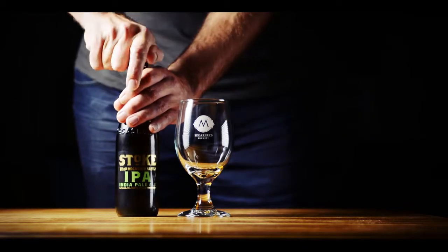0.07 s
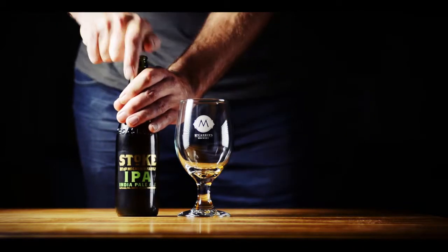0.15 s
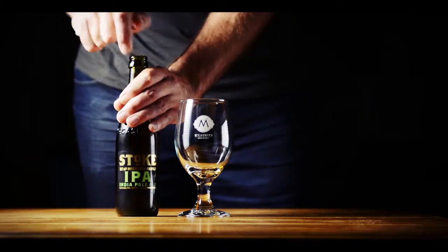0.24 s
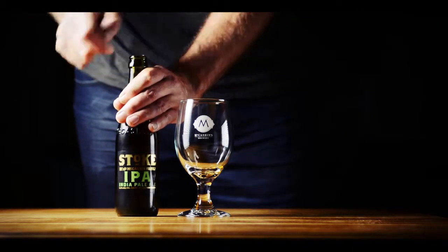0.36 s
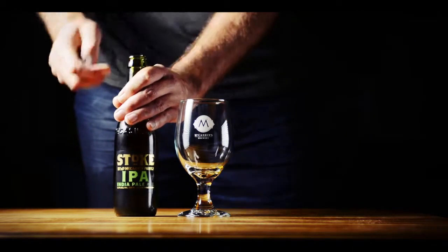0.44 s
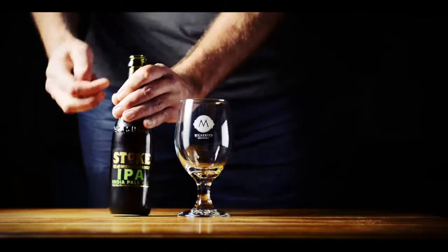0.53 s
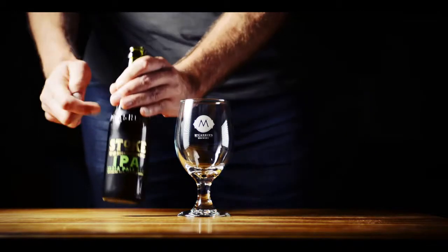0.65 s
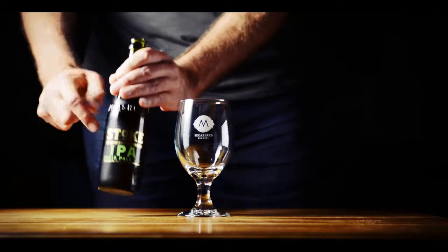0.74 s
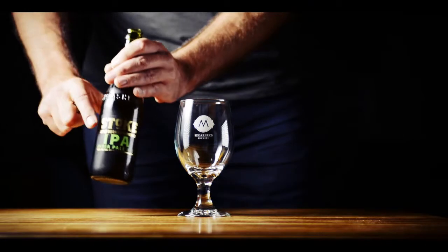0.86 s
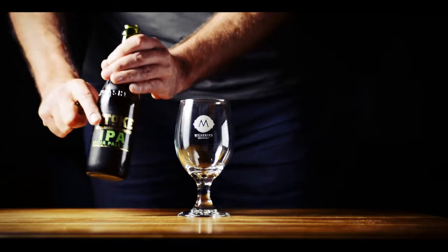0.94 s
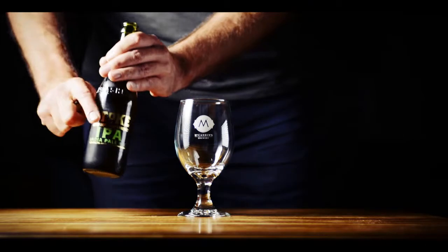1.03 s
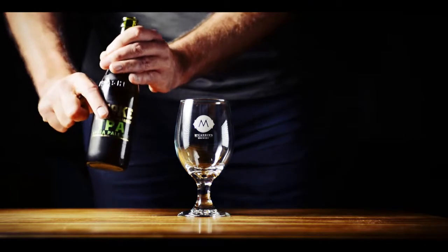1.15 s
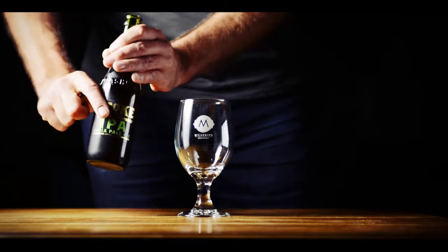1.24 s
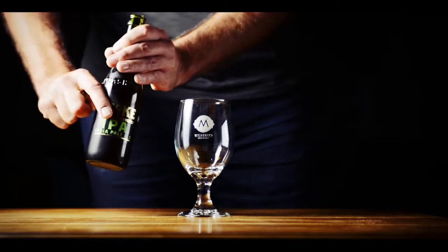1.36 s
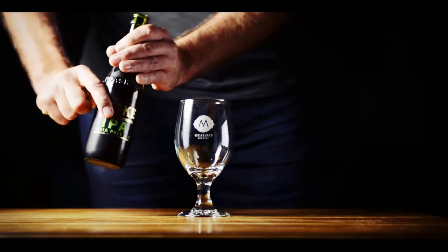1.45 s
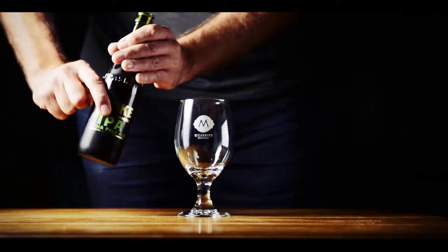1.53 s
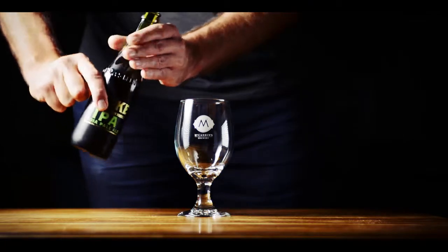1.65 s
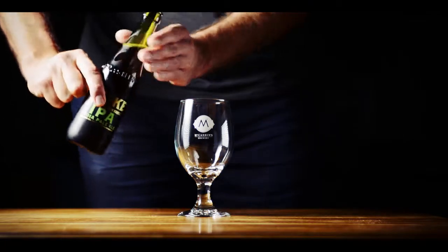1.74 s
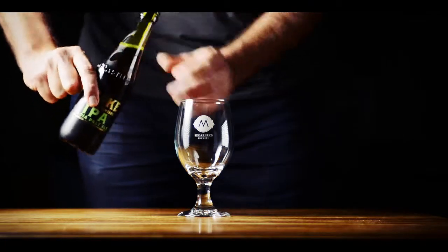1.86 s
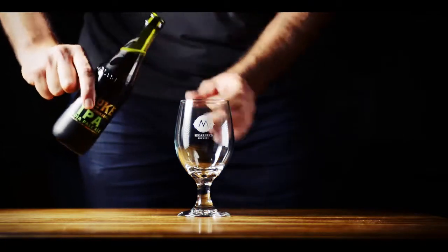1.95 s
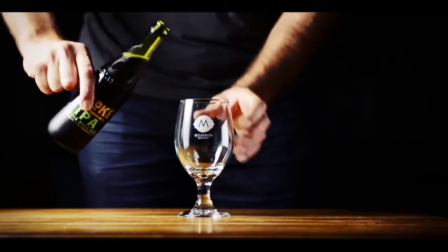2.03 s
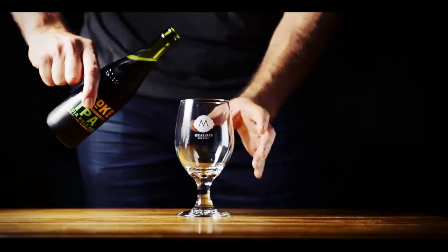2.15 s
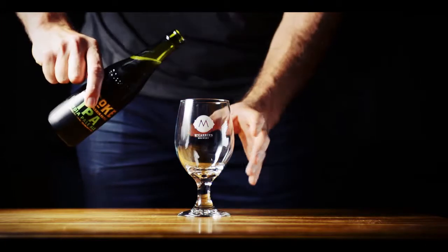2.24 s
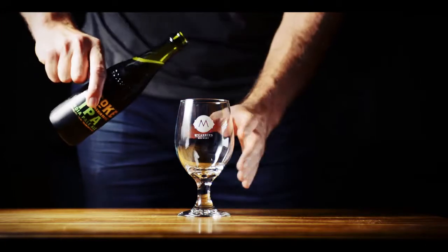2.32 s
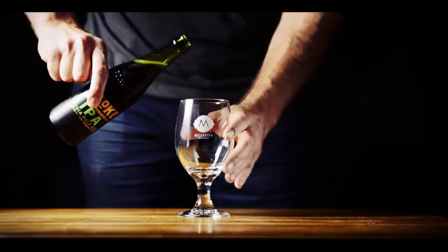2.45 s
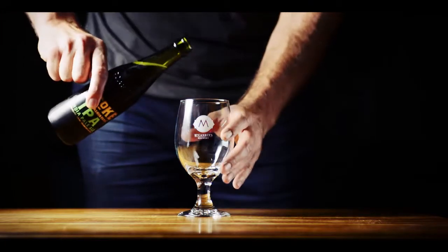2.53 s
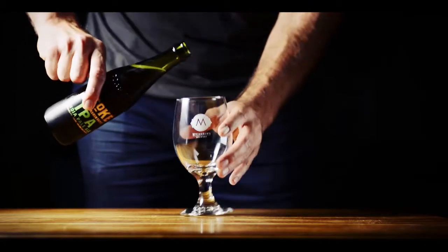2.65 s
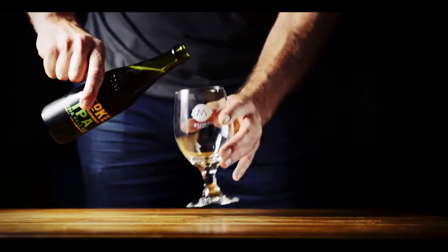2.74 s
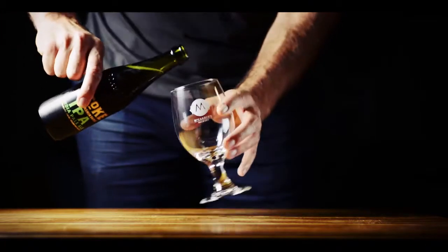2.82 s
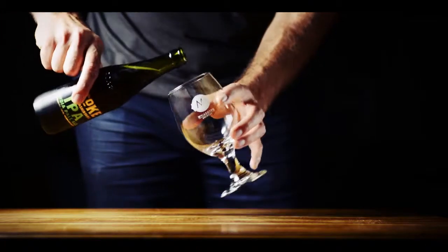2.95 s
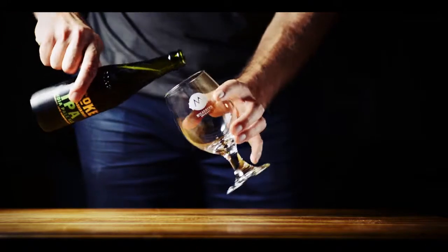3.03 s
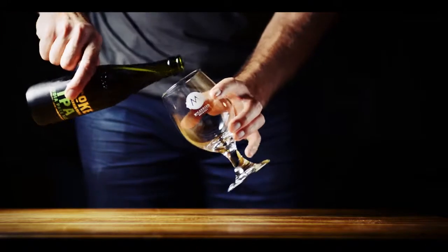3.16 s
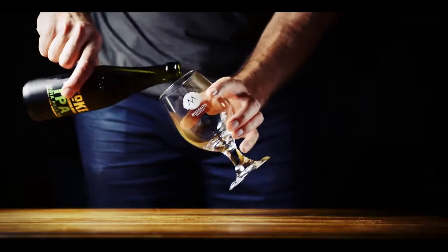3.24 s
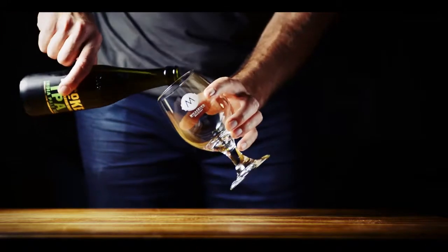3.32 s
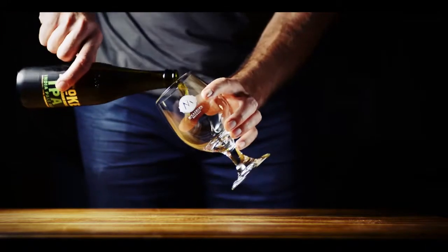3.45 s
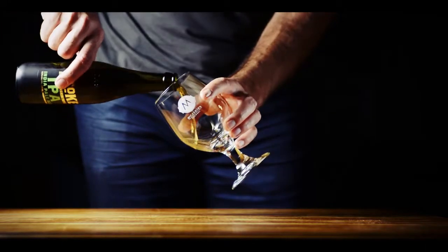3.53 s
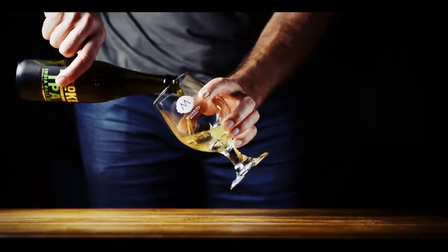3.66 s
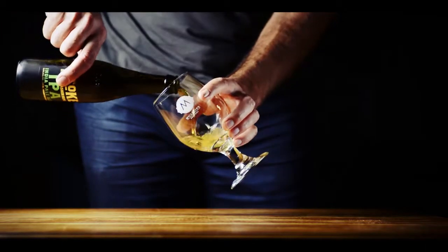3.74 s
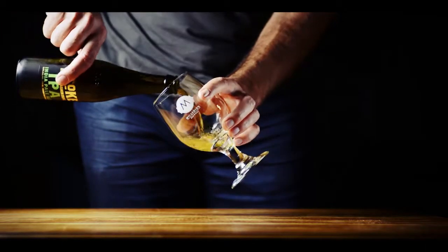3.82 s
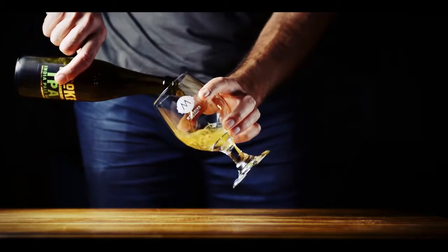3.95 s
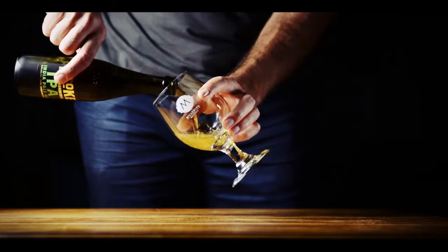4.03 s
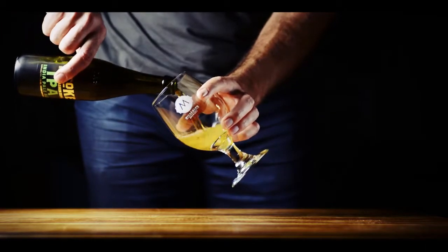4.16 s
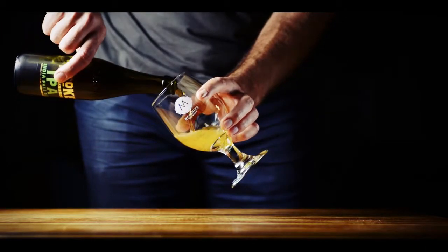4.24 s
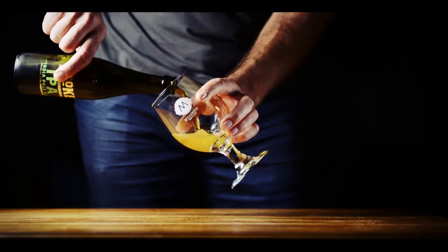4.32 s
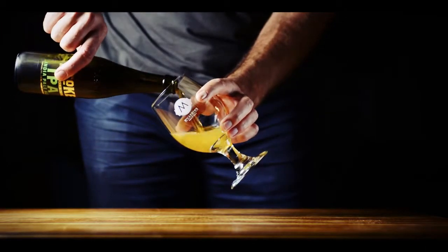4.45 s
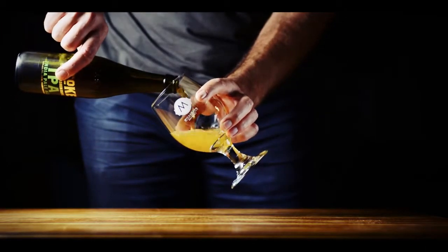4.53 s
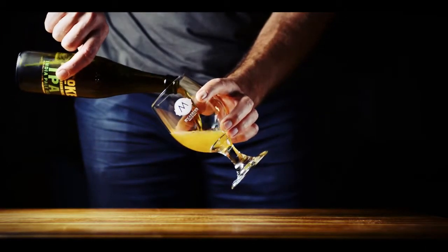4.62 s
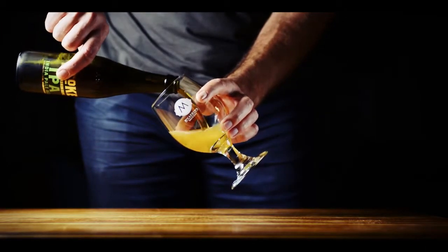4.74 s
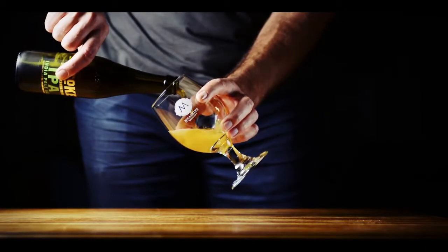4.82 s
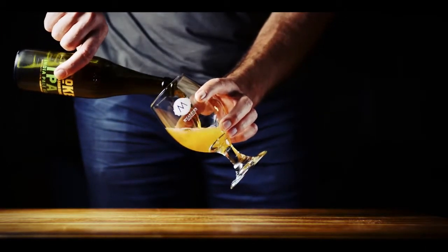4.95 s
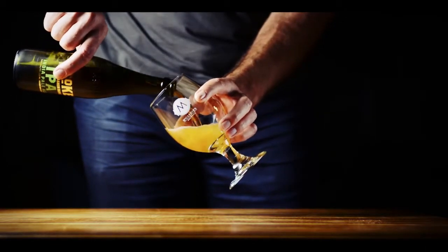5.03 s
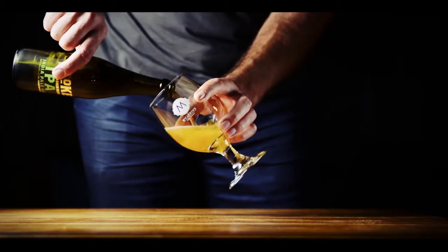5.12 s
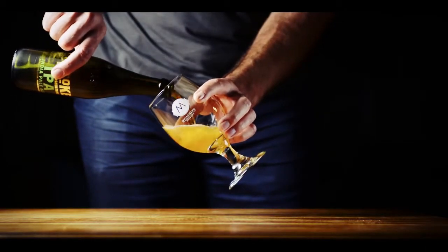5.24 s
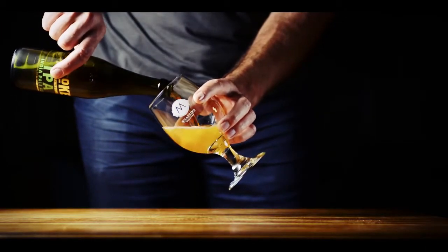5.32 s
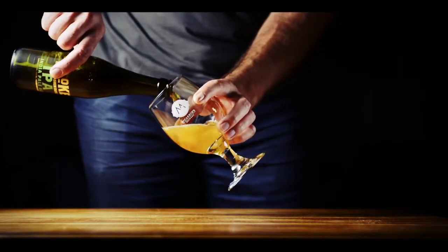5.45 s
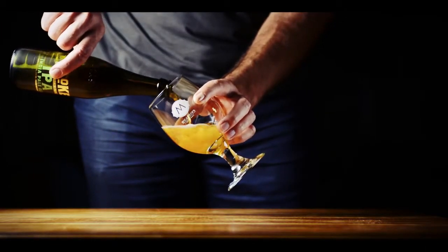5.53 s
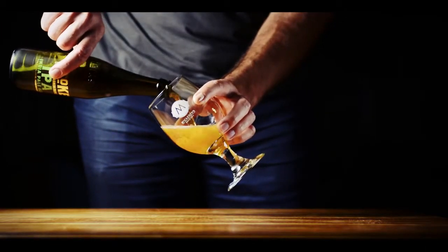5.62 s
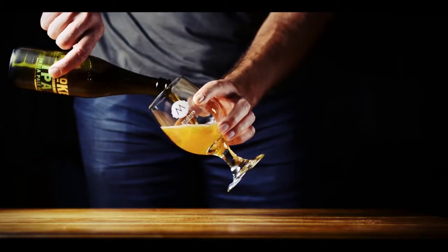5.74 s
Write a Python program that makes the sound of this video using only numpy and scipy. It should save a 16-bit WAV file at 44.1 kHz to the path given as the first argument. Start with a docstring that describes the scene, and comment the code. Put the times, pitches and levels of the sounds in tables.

```python
"""Beer glugs out of a bottle neck into a tilted glass: slugs ring the bowl, bubbles plop and plink as swept tones.
Before it a full bottle bumps a wooden table and its crimped metal cap is wrenched off, dropped and left
rattling, from clicks and grit driving resonant modes; fingers tick on the label as short noise puffs, and a
stemmed glass is lifted with a knock. Behind it lie a quiet room's air noise, a faint machine hum and hiss.
"""
import sys
import numpy as np
from scipy import signal
from scipy.fft import rfft, irfft, next_fast_len
from scipy.io import wavfile

SR = 44100
rng = np.random.default_rng(int(sys.argv[2]) if len(sys.argv) > 2 else 0)


def bounce(signal):
    """Save signal as a 16-bit WAV file at the path given by the first command-line argument."""
    frames = np.transpose(np.atleast_2d(signal))
    limited = np.clip(frames, -1, 1)
    pcm = np.round(limited * 32767).astype(np.int16)
    wavfile.write(sys.argv[1], SR, pcm)


N = 254898

# Room-tone spectrum: pitch_hz, level_db (per Hz, relative)
AIR_SPECTRUM = [(15, -58), (25, -25), (43, -11.5), (102, -4), (167, -8), (191, -7), (303, -9.5),
                (1170, -20.5), (1810, -20.5), (2720, -25), (8980, -28.5), (16300, -27)]
# Hiss spectrum: pitch_hz, level_db (per Hz, relative)
HISS_SPECTRUM = [(24, -29), (40, -9.5), (233, -6), (1250, -11), (14700, -13), (16300, -17.5)]
# Hums of a distant machine: pitch_hz, width_hz, level_db
MACHINE_HUMS = [(60, 9.7, -84.5), (99.63, 5.4, -74), (200.4, 6, -77), (240.3, 7.7, -87.5), (299, 15, -76.5),
                (2100, 540, -80.5)]
# Rate of bursting droplets: time_s, droplets_per_s
FIZZ_RATE = [(3.8, 62), (4.1, 260), (4.35, 580), (4.6, 390), (4.75, 30), (5.78, 5)]
# Fingers and label ticking on the bottle: start_s, level_db, pitch_hz (centre of the body colour)
LABEL_TICKS = [(1.187, -40, 3200), (1.4092, -43, 2500), (1.4964, -34.5, 3310), (1.5788, -51, 1920),
               (1.6633, -32.5, 3440), (1.67, -33, 3030), (1.7674, -33.5, 4000), (2.2897, -48, 3330)]
# Blows on the table top: start_s, main_level_db, upper_level_db, boom_level_db
TABLE_BLOWS = [(.001, -41, -39, -43), (.009, -33.5, -43, -40.5), (0.021, -56, -51, -48.5),
               (0.126, -48, -62.5, -50), (.186, -51.5, -54.5, -53), (.204, -53, -57.5, -52),
               (.507, -34, -48.5, -50.5), (0.522, -47, -60, -53.5), (.573, -41, -52.5, -47),
               (.593, -45, -63.5, -59.5), (2.627, -57, -53, -66), (2.639, -62, -43.5, -70),
               (2.645, -35.5, -39, -52.5)]
# Main, upper and boom modes of the table: pitch_hz, level_db, t60_s
TABLE_MAIN_MODES = [(140.7, 0, 0.057), (183.6, -5, 0.22), (241.5, -0.5, .15), (300.8, -1.5, 0.11),
                    (361, -4, 0.081)]
TABLE_UPPER_MODES = [(507, -5.5, 0.024), (659.7, -0.5, .05), (759, -6.5, 0.06), (930, -4.5, 0.028),
                     (1357, -7.5, 0.012), (1750, -7, 0.024)]
TABLE_BOOM_MODES = [(96.56, -1, .7), (106, -9.5, 0.34)]
# Foot of the glass scuffing off the table: start_s, level_db
GLASS_SCUFFS = [(2.6391, -40), (2.6444, -46)]
# Modes of the glass: pitch_hz, level_db, t60_s
GLASS_MODES = [(2746, -10, 0.1), (2680, -8, 0.034), (2280, -4, 0.007), (3330, -0.5, 0.0041),
               (6450, -5.5, 0.004), (8900, -4.5, 0.01), (10460, 1, 0.01), (10150, -13.5, 0.085),
               (14350, -8, 0.018)]
# Cap and opener contacts: start_s, level_db, colour (-1 dull, 0 middle, 1 bright)
CAP_CONTACTS = [(.0054, -31, 0.46), (.0094, -33, -0.44), (0.1303, -59, 0), (.172, -53, 0),
                (0.1843, -46.5, 0.42), (.2044, -49, 0), (0.3424, -58, 0.15), (0.3978, -49, 0.24),
                (0.4071, -46.5, 0), (0.4332, -47.5, -1.2), (0.443, -34.5, 0), (0.4923, -30.5, 0),
                (0.4945, -14, 0), (0.5033, -21, 0), (.5114, -26, 0), (0.5221, -22.5, 0),
                (0.5256, -20.5, .3), (.5314, -18, 0.87), (0.5365, -17, 0.45), (.5446, -17, 0.56),
                (0.5458, -12, 0.86), (0.5485, -20.5, 0.89), (0.5502, -13.5, .4), (0.552, -22, 0.68),
                (0.5567, -27.5, 0.43), (.5684, -49.5, .4), (0.5977, -46.5, 1), (0.6612, -38.5, 0.98),
                (0.6649, -29.5, 0.39), (.6978, -28.5, -0.42), (.7064, -36, -0.079), (0.7116, -40, -.1),
                (0.7152, -42, 0.78), (0.7192, -35, 0), (0.7193, -27.5, -0.32), (0.7562, -40, 0.056),
                (0.7612, -30.5, 0.43), (0.8679, -49.5, -0.55)]
# Metal grinding on glass, swelling to a peak and letting go: start_s, peak_s, level_db, swell_db, colour (-1 to 1)
CAP_SCRAPES = [(0.484, 0.496, -39.5, 42, -0.4), (0.493, 0.529, -47, 11, .3), (.544, 0.557, -42.5, 2.5, .7),
               (.642, .662, -58.5, 18, 0.4), (.698, 0.72, -44, 18, -0.24), (0.761, 0.762, -53.5, 16, -0.15)]
# Low, middle and high modes of the cap: pitch_hz, level_db, t60_s
CAP_LOW_MODES = [(1550, -4.5, 0.0047), (1978, 8, 0.0031), (2560, 5.5, .008)]
CAP_MIDDLE_MODES = [(2950, -0.48, 0.0068), (3380, -1.5, 0.0086), (3999, 0.7, .007), (4710, -1.1, 0.0075),
                    (5290, -2.1, .004)]
CAP_HIGH_MODES = [(5940, -4, 0.0019), (7260, 3.5, 0.0028), (7935, -29.5, .15), (8235, 1, 0.008),
                  (8447, -28, 0.13), (8800, -0.5, 0.0018), (12050, -4, 0.011), (13770, 0, 0.0015)]
# Slugs of beer leaving the neck: start_s, push_level_db, hollow_level_db
BEER_SLUGS = [(3.5551, -37, -39.5), (3.8368, -31.5, -39), (4.1191, -30, -37.5), (4.4051, -30, -35),
              (4.736, -34, -42.5), (5.0581, -34.5, -38), (5.3696, -33.5, -42), (5.7522, -33.5, -45)]
# Large bubbles: start_s, pitch_hz, level_db
LARGE_BUBBLES = [(3.8484, 658, -52), (3.927, 1130, -48), (4.1344, 1154, -48), (4.4004, 1210, -49),
                 (4.4308, 1190, -43.5), (4.6109, 744, -44), (4.6109, 1154, -43.5), (4.6788, 754, -48),
                 (4.8904, 760, -49), (4.9122, 800, -46.5), (4.9237, 820, -34.5), (4.9437, 850, -41.5),
                 (4.9437, 1154, -40.5), (4.9506, 866, -29.5), (4.9584, 800, -31.5), (4.9584, 1180, -57),
                 (4.9654, 775, -36), (4.9814, 733, -45), (5.2544, 733, -44), (5.2714, 746, -50),
                 (5.5354, 770, -51), (5.6294, 762, -56)]
# Small bubbles, each with its splash: start_s, pitch_hz, ring_level_db, splash_level_db
SMALL_BUBBLES = [(3.5553, 2210, -28.5, -49.5), (3.8366, 2350, -33, -44), (3.8486, 2750, -42, -50),
                 (3.894, 2710, -61, -45.5), (3.927, 2760, -75, -45), (3.9992, 2430, -26.5, -41.5),
                 (4.007, 5480, -57, -50), (4.0124, 2313, -52, -46), (4.042, 2330, -50, -50),
                 (4.0574, 2800, -41, -52), (4.0812, 2320, -70, -50), (4.1047, 2300, -53, -42),
                 (4.1209, 2350, -37.5, -46), (4.1344, 2330, -46, -51), (4.2033, 2313, -40, -48),
                 (4.257, 3310, -69, -65), (4.2794, 2890, -51.5, -50.5), (4.3153, 3190, -51, -62),
                 (4.33, 3080, -57, -58), (4.3386, 2840, -53, -62), (4.3492, 2820, -47.5, -47.5),
                 (4.4004, 3100, -43, -55), (4.4058, 3490, -44.5, -47), (4.43, 2330, -37.5, -59),
                 (4.4312, 2870, -38.5, -60), (4.445, 2313, -44.5, -52), (4.467, 2900, -44, -52),
                 (4.4692, 3900, -49.5, -62), (4.484, 2900, -36.5, -60), (4.5213, 2970, -55, -53),
                 (4.531, 2980, -64, -66), (4.56, 2450, -59, -63), (4.5875, 2950, -46.5, -49.5),
                 (4.6097, 2950, -38.5, -43.5), (4.68, 2920, -47, -54), (4.6977, 2950, -49.5, -63),
                 (4.7357, 3030, -34, -39.5), (4.9113, 3070, -56, -55), (4.9233, 3050, -51.5, -45),
                 (4.9417, 3180, -50, -46), (4.9511, 2300, -37, -42.5), (4.9592, 2370, -35.5, -50),
                 (5.0582, 3037, -30.5, -45), (5.3707, 2930, -73, -51), (5.7532, 3150, -72, -64)]
# The bowl hums as fingers shift on it, one event: start_s, pitch_hz, level_db, t60_s
FINGERED_BOWL = (2.91, 870, -55, .12)
# Large air pockets rising into the bottle: start_s, first_pitch_hz, last_pitch_hz, level_db
AIR_POCKETS = [(3.56, 55.6, 45.7, -60.5), (3.839, 190.5, 184, -55), (4.121, 148.3, 220, -50),
               (4.407, 158, 298, -51.5), (4.675, 45, 76.4, -58), (5.01, 55.2, 96, -54.5),
               (5.323, 54.2, 96, -50.5), (5.68, 72.8, 125.4, -43.5)]

AIR_DB, HISS_DB = -65, -73.5
WHINE_HZ, WHINE_WANDER_HZ, WHINE_WIDTH_HZ, WHINE_DB = 9010, 120.3, 250, -81
ROOM_T60_S, ROOM_DB, WALL_CUT_HZ = 0.31, -20, 3000
TOP_CUT_HZ = 16700
TICK_T60_S, TICK_TREBLE_DB = 0.029, -8.5
SNAP_DB = 2.5   # bare broadband click of a cap contact, against the contact's level
CLACK_OFF_COLOUR_DB, SCRAPE_OFF_COLOUR_DB = 14, 8.5   # loss of a mode group per step of colour away from it
LET_GO_DB_PER_S = 2500
RING_LAG_S = .0007   # rings follow the contact
HOLLOW_HZ, HOLLOW_RISE_HZ_PER_S = 638, 52   # the air space shrinks from the first slug on
PLOP_CYCLES = 28
PLINK_CYCLES, PLINK_CYCLES_PER_KHZ = 50.0, 54.6   # cycles at 2.3 kHz; higher plinks ring for more
PARTNER_RATIO, PARTNER_DB = 1.3, -17.5   # a weaker ring lies this far above a low plink, or below a high one
STRAY_LOW_HZ, STRAY_HIGH_HZ, STRAY_DB = 1400, 5220, -13   # short stray bubble freed by every plink
GULP_S, GULP_EVEN_HZ = 0.065, 73.5   # pockets deeper in pitch than this swell late, higher ones early


def amp(db):
    """Gain of a level in dB."""
    return 10 ** (np.asarray(db) / 20)


def rms_one(x):
    """Scales a sound to rms 1."""
    return x / np.sqrt(np.mean(x ** 2) + 1e-20)


def band(x, low_hz, high_hz):
    """Butterworth band-pass."""
    sos = signal.butter(2, [low_hz, min(high_hz, SR * .45)], "band", fs=SR, output="sos")
    return signal.sosfilt(sos, x)


def add(out, start_s, sound):
    """Mixes a short sound in at its start time."""
    i = max(round(start_s * SR), 0)
    out[i:i + len(sound)] += sound[:N - i]


def dying(t60):
    """Time axis and an exponential envelope losing 60 dB in t60 seconds."""
    t = np.arange(int(np.clip(t60, .003, .5) * SR)) / SR
    return t, amp(-60 * t / t60)


def ring(force, modes):
    """A bank of decaying resonators: a unit click rings each mode at its own level; signs alternate."""
    out = 0
    for k, (hz, db, t60) in enumerate(modes):
        radius = amp(-60 / (t60 * SR))
        w = 2 * np.pi * hz / SR
        resonator = [1, -2 * radius * np.cos(w), radius * radius]
        mode = signal.lfilter([0, np.sin(w)], resonator, force + 1e-18)
        out = out + (-1) ** k * amp(db) * mode
    return out


def grit(size, spread_db):
    """Dense uneven micro-contacts of random sign; rms 1."""
    unevenness_db = spread_db * np.minimum(rng.exponential(1, size), 4)
    return rms_one(rng.standard_normal(size) * amp(unevenness_db))


def coloured(spectrum):
    """Steady noise shaped to a spectrum in dB per Hz; rms 1."""
    size = next_fast_len(N)
    hz = np.maximum(np.arange(size // 2 + 1) * SR / size, 1)
    table = np.array(spectrum)
    gain = amp(np.interp(np.log(hz), np.log(table[:, 0]), table[:, 1]))
    return rms_one(irfft(rfft(rng.standard_normal(size)) * gain, size)[:N])


def whine():
    """A thin high band of noise whose centre wanders slowly."""
    points = rng.standard_normal(int(np.ceil((N / SR + 1) / .4)))   # one every 0.4 s
    wander = np.interp(np.arange(N) / SR, np.arange(0, N / SR + 1, .4), points)
    low_pass = signal.butter(2, WHINE_WIDTH_HZ / 2, fs=SR, output="sos")
    flutter = rms_one(signal.sosfilt(low_pass, rng.standard_normal((2, N))))
    phase = 2 * np.pi * np.cumsum(WHINE_HZ + WHINE_WANDER_HZ * wander) / SR
    return amp(WHINE_DB) * (flutter[0] * np.sin(phase) + flutter[1] * np.cos(phase))


def machine_hum():
    """A distant machine: narrow noise bands that waver like unsteady tones."""
    hums = np.zeros(N)
    for hz, width_hz, db in MACHINE_HUMS:
        noise = rng.standard_normal(N + SR)   # the first second lets the filter settle
        hums += amp(db) * rms_one(band(noise, hz - width_hz / 2, hz + width_hz / 2)[SR:])
    return hums


def room_tone():
    """Steady air noise with the machine hum and the drifting whine."""
    return amp(AIR_DB) * coloured(AIR_SPECTRUM) + machine_hum() + whine()


def room(x):
    """Diffuse reflections: band-limited noise dying away after a 4 ms gap."""
    t, fall = dying(ROOM_T60_S)
    echo = band(rng.standard_normal(len(t)), 220, WALL_CUT_HZ) * fall * (t > .004)
    return signal.fftconvolve(x, echo / np.sqrt(np.sum(echo ** 2)))[:N]


def ticks():
    """Fingers on the label: short gritty puffs with a body colour and a thin treble edge."""
    out = np.zeros(N)
    t, fall = dying(TICK_T60_S)
    for s, db, hz in LABEL_TICKS:
        attack = 1 - np.exp(-t / 0.00034)
        puff = amp(db) * fall * attack * grit(len(t), spread_db=-6.0)
        body = band(puff, hz / 1.15, hz * 1.034) + 0.6 * band(puff, 1670, 3630)
        add(out, s, body + amp(TICK_TREBLE_DB) * band(puff, 7570, 10400))
    return out


def knocks():
    """Soft blows ring the table's modes; the foot of the glass rings as it scuffs off it."""
    low, upper, boom, sharp = np.zeros((4, N))
    t, fall = dying(0.03005)
    for s, db, upper_db, boom_db in TABLE_BLOWS:
        low[max(round((s - .003) * SR), 0)] += amp(db)   # the main modes speak 3 ms ahead
        boom[round(s * SR)] += amp(boom_db)
        scuff = (t == 0) + .08 * fall * rng.standard_normal(len(t))   # a click, then the contact scuffs
        add(upper, s, amp(upper_db) * scuff)
    t, fall = dying(0.027)
    for s, db in GLASS_SCUFFS:
        scuff = .1 * fall * rng.standard_normal(len(t))
        scuff[0] = 1
        add(sharp, s, amp(db) * scuff)
    table = ring(low, TABLE_MAIN_MODES) + ring(boom, TABLE_BOOM_MODES) + ring(upper, TABLE_UPPER_MODES)
    return table + ring(sharp, GLASS_MODES)


def colour_db(db, colour, off_db):
    """Levels of the low, middle and high mode groups for a colour held between -1 and 1."""
    return db - off_db * np.abs(np.arange(-1, 2) - np.clip(colour, -1, 1))[:, None]


def cap():
    """Contacts and grinding drive three groups of cap modes; the colour of each favours one group."""
    size = SR   # the cap is heard only in the first second
    force, snap, sand = np.zeros((3, size)), np.zeros(size), grit(size, spread_db=3)
    t, fall = dying(0.014)
    for s, db, colour in CAP_CONTACTS:
        i = round((s + .0006) * SR)
        blow = .1 * fall * sand[i:i + len(t)]
        blow[0] = -1   # a sharp click trailed by grit
        force[:, i:i + len(t)] += amp(colour_db(db, colour, CLACK_OFF_COLOUR_DB)) * blow
        snap[i] -= amp(db + SNAP_DB)
    t, sand = np.arange(size) / SR, grit(size, spread_db=6.0)
    for start_s, peak_s, db, swell_db, colour in CAP_SCRAPES:
        swell = np.interp(t, [start_s, peak_s], [-swell_db, 0], -150)
        shape_db = swell - LET_GO_DB_PER_S * np.maximum(t - peak_s, 0)
        force += amp(colour_db(db, colour, SCRAPE_OFF_COLOUR_DB) + shape_db) * sand
    sound = snap + ring(force[0], CAP_LOW_MODES)
    sound = sound + ring(force[1], CAP_MIDDLE_MODES) + ring(force[2], CAP_HIGH_MODES)
    return np.pad(band(sound, 900, 13500), (0, N - size))   # a small cap radiates no bass


def fizz():
    """Small droplets burst at random, each ringing briefly at one of sixteen pitches."""
    s, per_s = np.transpose(FIZZ_RATE)
    born = rng.random(N) < np.interp(np.arange(N) / SR, s, per_s, 0) / SR
    sizes = born * amp(-68.5 + np.minimum(6.0 * rng.exponential(1, N), 13))
    pitches, dealt = np.geomspace(2000, 4600, 16), rng.integers(0, 16, N)
    return sum(ring(sizes * (dealt == k), [(hz, 0, 30 / hz)]) for k, hz in enumerate(pitches))


def tone(hz, db, t60, rise_s, glide, rough=0):
    """A ringing air cavity: quick swell, a decay that holds then drops, rising pitch; sloshing makes it waver."""
    t, _ = dying(t60)
    shape = (1 - np.exp(-t / rise_s)) * amp(-60 * (t / t60) ** 1.22)
    steps = rng.standard_normal((2, 40))   # new targets every four cycles
    waver, slip = (rough * np.interp(t * hz / 4, np.arange(40), step) for step in steps)
    phase = 2 * np.pi * hz * t * (1 + glide * t / t60) + slip
    return amp(db) * shape * (1 + .5 * waver) * np.sin(phase)


def slugs(out):
    """Each slug of beer leaves the neck with a soft push and rings the air in the bowl."""
    for s, push_db, db in BEER_SLUGS:
        hz = HOLLOW_HZ + HOLLOW_RISE_HZ_PER_S * (s - BEER_SLUGS[0][0])
        add(out, s, -tone(207, push_db, 0.014, rise_s=0.0012, glide=0.017))
        hollow = tone(hz, db, PLOP_CYCLES / hz, rise_s=0.001, glide=0.096, rough=0.08)
        add(out, s + RING_LAG_S, hollow)


def plops(out):
    """Large bubbles ring as air cavities, rougher the higher their pitch."""
    for s, hz, db in LARGE_BUBBLES:
        rough = 0.23 * (hz / 750) ** 4.15
        plop = tone(hz, db, PLOP_CYCLES / hz, rise_s=0.67 / hz, glide=0.016, rough=rough)
        add(out, s + RING_LAG_S, plop)


def plinks(out):
    """Small bubbles ring with a weaker partner, a gritty splash and a short stray bubble."""
    t, fall = dying(0.04)
    for s, hz, db, splash_db in SMALL_BUBBLES:
        ring_s = s + RING_LAG_S
        noise = fall * grit(len(t), spread_db=3.5)
        splash = band(noise, 1890, 4890) + 0.43 * band(noise, 840, 2050)
        splash = splash + 0.68 * band(noise * fall, 4000, 9600)   # the treble dies sooner
        add(out, ring_s, amp(splash_db) * splash)
        stray_hz = STRAY_LOW_HZ * (STRAY_HIGH_HZ / STRAY_LOW_HZ) ** rng.random()
        stray = tone(stray_hz, db + STRAY_DB, 34.0 / stray_hz, rise_s=0.00033, glide=.1, rough=.6)
        add(out, ring_s, stray)
        partner_hz = hz * PARTNER_RATIO if hz < 2500 else hz / PARTNER_RATIO
        for ring_hz, ring_db in (hz, db), (partner_hz, db + PARTNER_DB):
            cycles = PLINK_CYCLES + PLINK_CYCLES_PER_KHZ * (ring_hz / 1000 - 2.3)
            plink = tone(ring_hz, ring_db, cycles / ring_hz, rise_s=.00045, glide=0.035, rough=0.57)
            add(out, ring_s, plink)


def gulps(out):
    """Air pockets rising into the bottle: single deep swells whose pitch slides from first to last."""
    share = np.arange(int(GULP_S * SR)) / (GULP_S * SR)
    for s, first_hz, last_hz, db in AIR_POCKETS:
        phase = 2 * np.pi * GULP_S * (first_hz * share + (last_hz - first_hz) * share ** 2 / 2)
        swell = np.sin(np.pi * share ** (GULP_EVEN_HZ / first_hz))
        add(out, s, amp(db) * swell * np.sin(phase))


def pour():
    """Slugs push and ring the bowl, bubbles plop and plink, air pockets gulp, the bowl hums."""
    out = np.zeros(N)
    slugs(out)
    plops(out)
    plinks(out)
    s, hz, db, t60 = FINGERED_BOWL
    add(out, s, tone(hz, db, t60, rise_s=0.017, glide=0))
    gulps(out)
    return out


def scene():
    """All sources sit on the axis of one close microphone; the glass shields the pour from the room."""
    open_air = cap() + ticks() + knocks()
    sheltered = pour() + fizz()
    near = open_air + sheltered + amp(ROOM_DB) * room(open_air + amp(-10) * sheltered)
    high_pass = signal.butter(4, 45, "high", fs=SR, output="sos")   # the deepest bass, below about 45 Hz, falls away
    near = signal.sosfilt(high_pass, near)
    return np.tile(near + room_tone(), (2, 1))


def record(dry):
    """Adds one hiss with opposite sign in the two channels, then cuts the top steeply."""
    hiss = amp(HISS_DB) * coloured(HISS_SPECTRUM) * [[1], [-1]]
    top_cut = signal.cheby2(16, 70, TOP_CUT_HZ, fs=SR, output="sos")
    return signal.sosfilt(top_cut, dry + hiss)


dry = scene()
out = record(dry)
bounce(out)
```